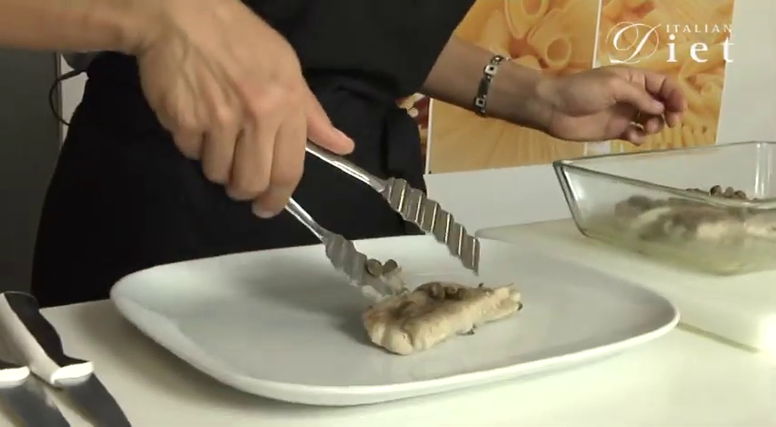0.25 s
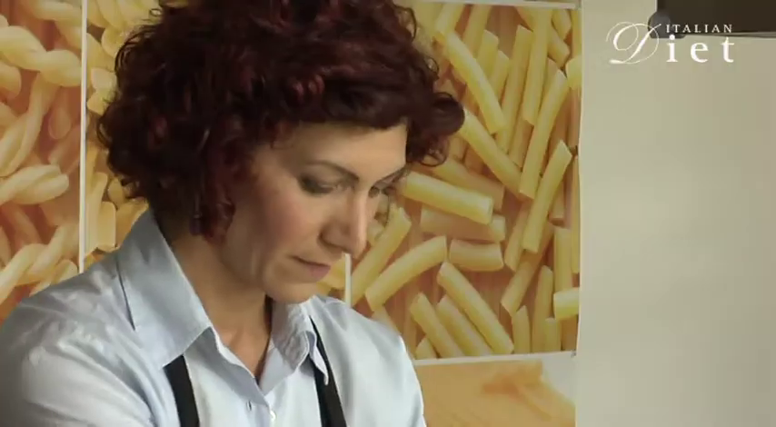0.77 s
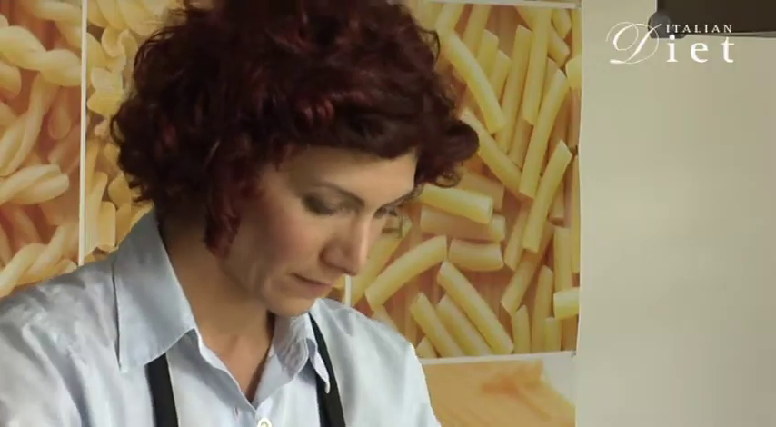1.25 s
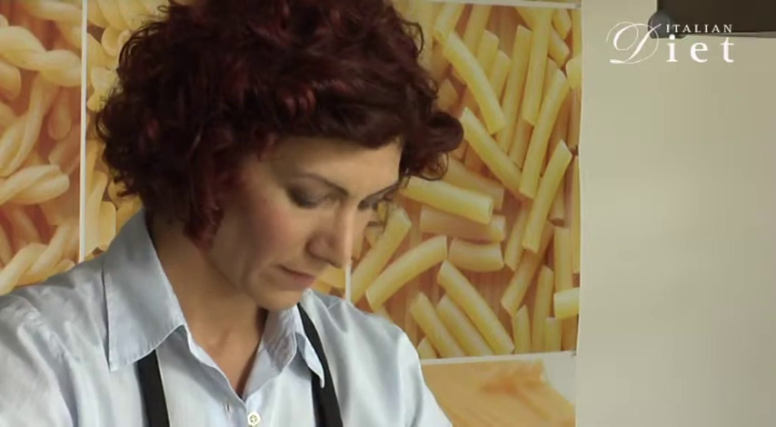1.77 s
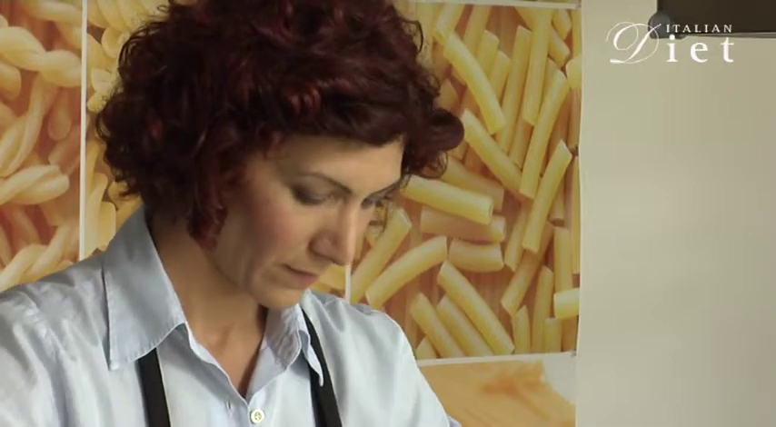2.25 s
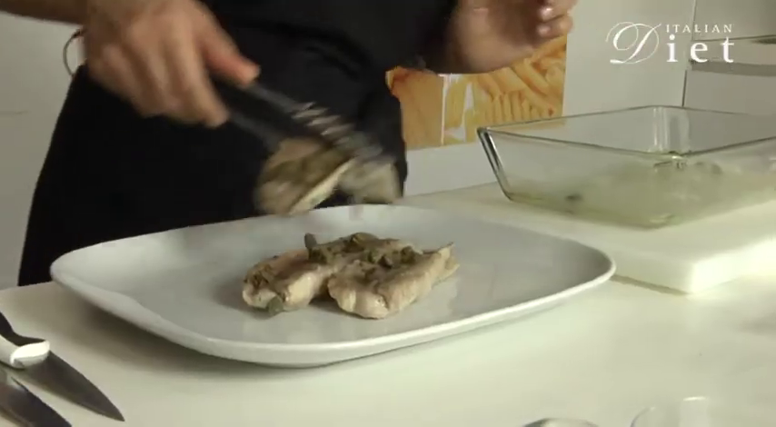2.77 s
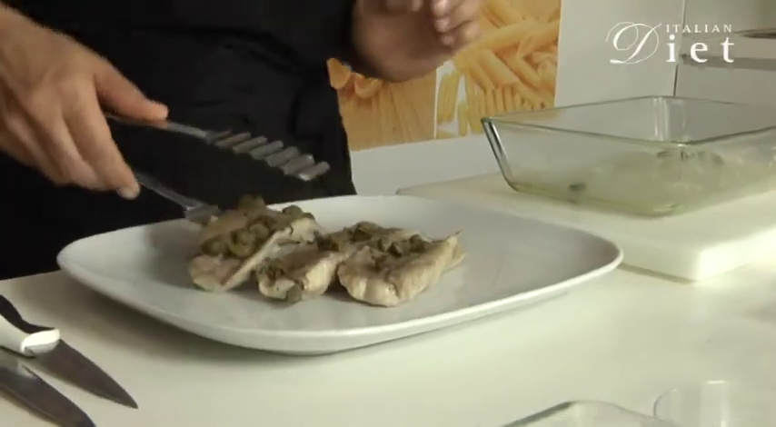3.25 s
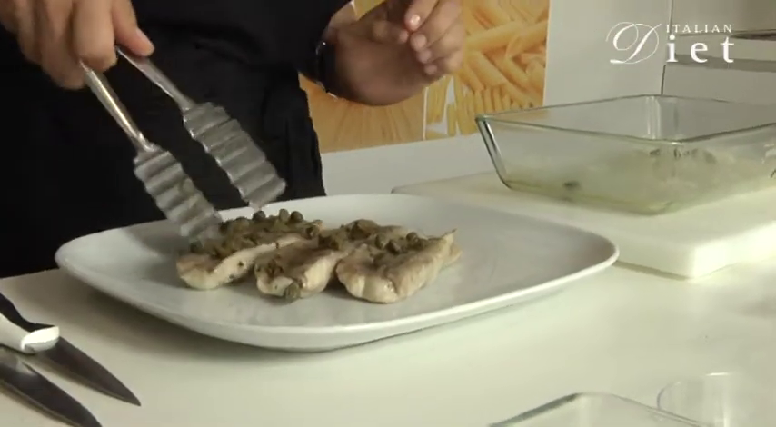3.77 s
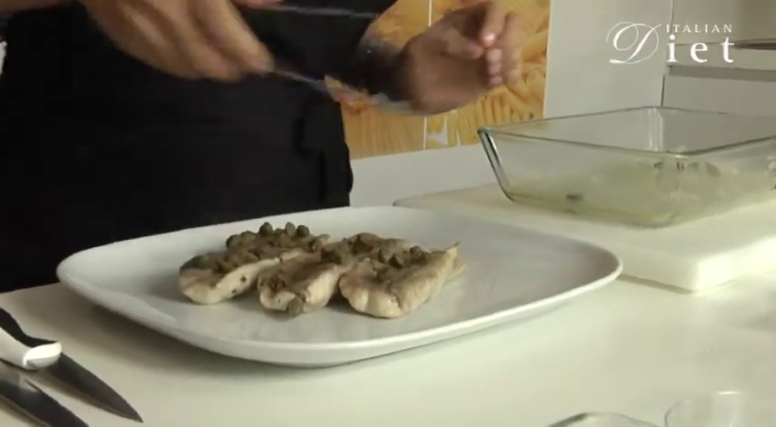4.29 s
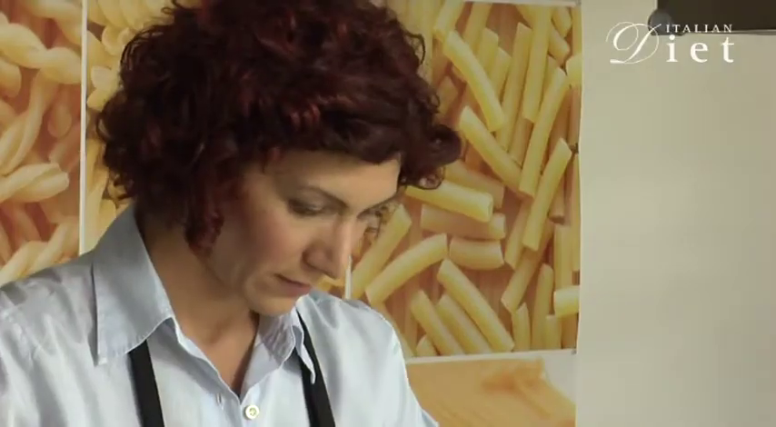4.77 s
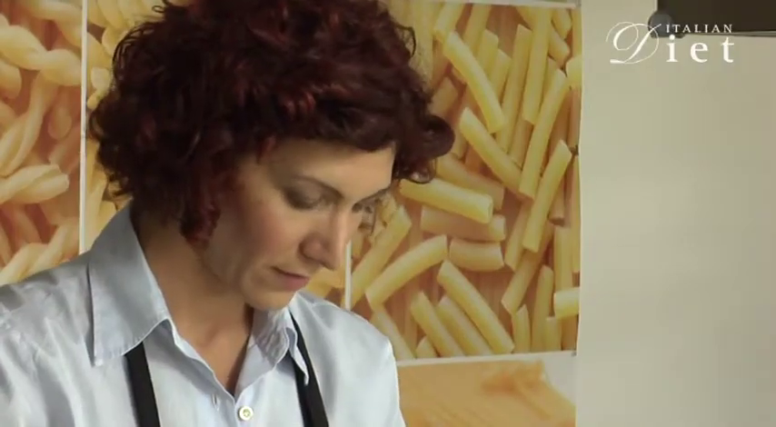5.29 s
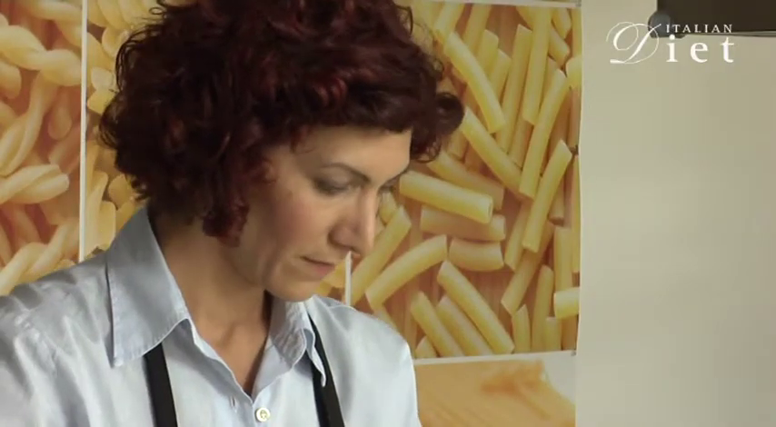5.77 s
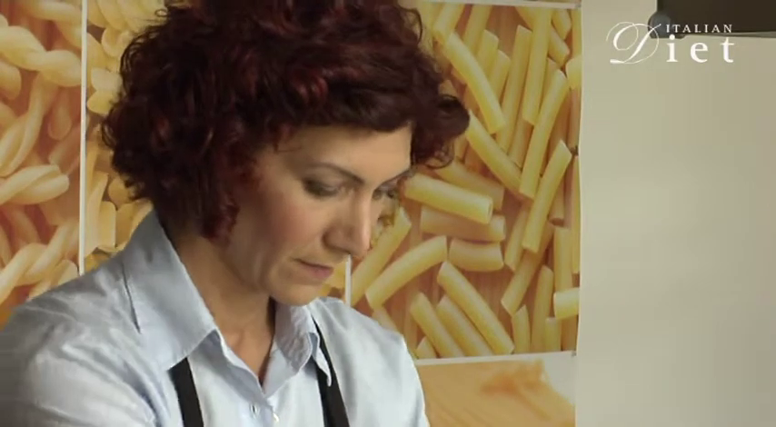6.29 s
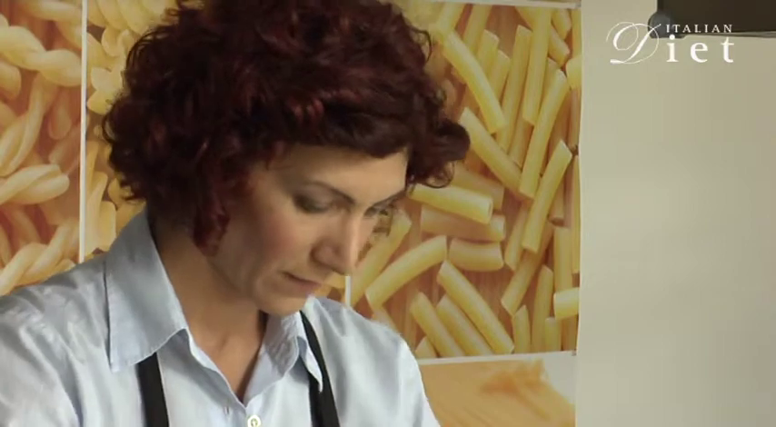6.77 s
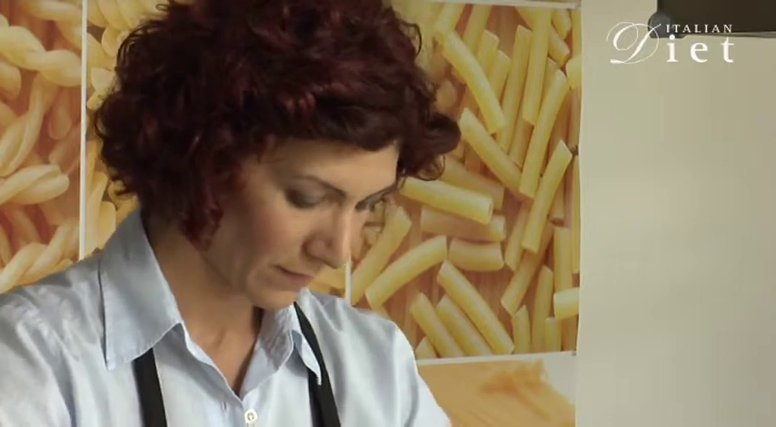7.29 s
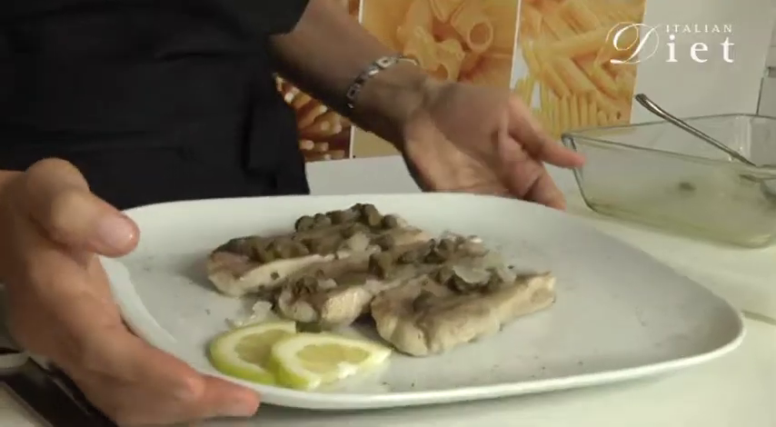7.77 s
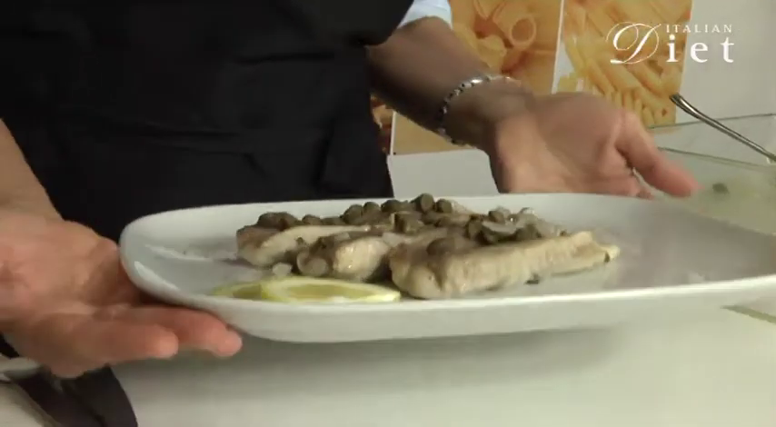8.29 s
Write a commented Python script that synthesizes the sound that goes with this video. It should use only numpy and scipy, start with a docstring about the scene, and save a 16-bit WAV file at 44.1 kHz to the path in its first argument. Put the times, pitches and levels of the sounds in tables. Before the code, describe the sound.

Close in a quiet, faintly humming kitchen, steel tongs scrape and tap a ceramic plate, then click twice on a glass dish. One sharp plate tap follows, then sleeve rustle and a tiny bracelet jingle. Suddenly the tongs drop on the worktop with a very loud crack, bouncing and ringing. A second smaller clatter follows, then dragging, a hard plate knock and a last ceramic clack.

```python
"""A low room tone with faint motor tones is heard first, in a quiet kitchen with the microphone close to the hands.
Near by, steel tongs tap a ceramic plate and a glass dish, a sleeve rustles and a bracelet jingles; then the tongs
drop on the worktop, where they knock, bounce and ring, and the plate is slid and lifted. Struck things are sums of
dying sines with a crack of noise, rubbing is trains of slips, cloth and room are shaped noise, and short echoes
follow. The sound is spliced twice, which cuts ringing and echoes short."""
import sys
import numpy as np
from scipy import signal
from scipy.io import wavfile
from scipy.ndimage import uniform_filter1d

SR = 44100
rng = np.random.default_rng(int(sys.argv[2]) if len(sys.argv) > 2 else 0)


def generate_wav(sig):
    """Save sig (samples, or channels by samples) to the path in sys.argv[1] as 16-bit PCM at SR."""
    pcm = np.round(np.clip(np.atleast_2d(sig).T, -1, 1) * 32767).astype(np.int16)
    wavfile.write(sys.argv[1], SR, pcm)


N = 376613  # length in samples

# Background spectrum of the room. Each row: frequency in Hz, relative density in dB.
ROOM_SPECTRUM = [(12, -52.5), (20, -31.5), (135, -4.5), (165, -5), (251, 0), (361, -8.5), (428, -8),
                 (566, -12.5), (670, -13), (1690, -28.5), (5210, -38.5), (6000, -35), (8410, -40.5),
                 (15800, -42), (16200, -61.5)]
# Swelling of the room hum. Each row: time in seconds, level in dB.
ROOM_LEVEL = [(0, -57), (1.3, -55.5), (1.7, -57), (2.8, -56), (4.2, -58), (5.2, -56), (6.2, -56),
              (7.4, -57), (8.54, -59)]
# A deep rumble from outside. Each row: time in seconds, level in dB rms.
RUMBLE_LEVEL = [(4.5, -85), (4.816, -70), (5.698, -66), (5.908, -74), (6.1, -64)]
# Faint tones of a motor. Each row: frequency in Hz, level in dB rms about which it wavers.
MOTOR_TONES = [(220.7, -69.5), (436.0, -72), (678.3, -80.5)]
# Dying of the echoes in the kitchen. Each row: frequency in Hz, t60 in seconds.
KITCHEN_T60 = [(250, 0.73), (1000, 0.38), (3000, 0.24), (7000, 0.15), (14000, 0.067)]
# Splices, with the start and a time past the end. Each entry: time in seconds.
SPLICE_TIMES = [0, 2.3205, 7.4408, 9]

# Strokes over the plate. Each row: start, strongest and end in seconds, strongest level in dB,
# blend of the two rubbing sounds from 0 to 1.
PLATE_SCRAPES = [(0.0, 0.055, 0.12, -72, 0.9), (0.128, 0.138, 0.155, -54, 0.16),
                 (0.15, 0.16, 0.2, -54, 0.1), (7.413, 7.523, 7.56, -60, 0.5),
                 (7.566, 7.568, 7.615, -50, 0.5), (7.96, 7.996, 8.05, -69, 0.45)]
# Sleeve rustles. Each row: start, strongest and end in seconds, strongest level in dB.
SLEEVE_RUBS = [(0.056, 0.146, .24, -66), (1.795, 1.88, 2.2, -72), (2.373, 2.558, 2.66, -66),
               (2.645, 2.757, 2.97, -71), (2.965, 3.116, 3.3, -69), (4.63, 4.78, 5.07, -59.5),
               (5.06, 5.105, 5.2, -62.5), (5.19, 5.24, 5.42, -61.5), (5.427, 5.484, 5.55, -69),
               (6.664, 6.777, 6.92, -57.5), (6.982, 7.083, 7.16, -58), (7.226, 7.414, 7.42, -57),
               (7.437, 7.498, 7.62, -60)]
# Spectrum of rubbed cloth. Each row: frequency in Hz, relative density in dB.
CLOTH_SPECTRUM = [(590, -34.5), (1000, 3.5), (1490, 0.5), (1680, 1), (2210, -3), (2470, -0.5), (6980, -6),
                  (14000, -31)]
# Small ticks and crinkles, and the sharp clicks at the onset of two worktop knocks (at 6.1602 and 6.2828).
# Each row: start in seconds, peak in dB, centre in Hz, decay time in ms.
TICKS_AND_CLICKS = [(.096, -60, 8500, 1.6), (.75, -58, 5500, 2.5), (1.8, -62, 4900, 2.5),
                    (1.036, -56.5, 3740, 3.2), (1.093, -56.5, 3000, 4.7), (1.336, -43, 4400, 1.06),
                    (3.191, -58, 5200, 1.5), (3.266, -55, 2400, 1.5), (3.347, -57, 5000, 1.5),
                    (3.370, -48.5, 3120, 1.2), (3.736, -59.5, 3230, 1.4), (4.972, -58, 10500, 28),
                    (5.04, -52, 2570, 1.3), (5.618, -57, 2780, 2.5), (5.988, -47, 840, 1.8),
                    (6.056, -52.5, 3240, 13.6), (6.056, -56.5, 8000, 3.5), (6.1602, -21, 7500, 1.2),
                    (6.2828, -36, 7000, 1.2), (7.016, -45, 4400, 3.3), (7.052, -45.5, 3470, 3.2),
                    (7.081, -46, 4800, 3.8), (7.283, -50, 3500, 3.3), (7.31, -51, 3470, 2.7),
                    (7.331, -52.5, 4530, 3.2), (7.348, -54, 6500, 2.6), (7.399, -41, 4500, 4)]
# Thin squeaks of rubbing. Each row: start, strongest and end in seconds, strongest level in dB,
# first and last pitch in Hz.
SQUEAK_GLIDES = [(.112, .16, .18, -55, 2910, 2720), (2.815, 2.9, 2.91, -68, 1537, 1537),
                 (7.172, 7.178, 7.23, -49.5, 1200, 1168), (7.365, 7.372, 7.418, -47.5, 1164, 1230)]
# Links at the wrist. Each row: start, strongest and end in seconds, strongest level in dB,
# blend of the two places on the links from 0 to 1.
JINGLES = [(4.84, 4.874, 4.95, -68, 0.1), (4.945, 4.985, 5.04, -62.5, .05), (5.036, 5.11, 5.19, -66, 0.95),
           (5.214, 5.235, 5.27, -62, .8)]
# Dragging on the worktop, and at 6.317 the chatter between knocks. Each row: start, strongest and end in seconds,
# strongest level in dB, dullness from 0 to 1.
WORKTOP_RUBS = [(6.317, 6.38, 6.43, -34, 0), (6.594, 6.65, 6.71, -39.5, 0.14),
                (7.035, 7.039, 7.07, -42, 0.93), (7.048, 7.076, 7.16, -44, 0.91),
                (7.142, 7.202, 7.23, -43.5, 0.38), (7.275, 7.287, 7.36, -43.5, .95),
                (7.376, 7.415, 7.42, -30, 0.48), (7.432, 7.447, 7.48, -43.5, .05),
                (7.46, 7.533, 7.56, -45, 0.23), (7.55, 7.583, 7.625, -41.5, 0.54)]

# Ringing modes of the ceramic plate. Each row: frequency in Hz, relative level in dB when struck at place 0
# and at place 1, undamped t60 in seconds.
PLATE_MODES = [(969, -24, -37, .1), (1292, -26, -24, .08), (1776, -28, -15, .08), (2702, -8, -20, .06),
               (2907, -28, -3, .05), (3128, -18, -25, .06), (3450, -36, -13, .05), (3806, -33, -14, .06),
               (4267, -1, -14, .045), (4650, -10, -3, .06), (4791, -17, -19, .24), (5675, -24, -11, .09),
               (5903, -11, -1, .085), (7569, -16, -34, .09), (7892, -40, -16, .06), (8800, -25, -36, .09),
               (10630, -31, -31, .08), (11140, -30, -24, .07), (12950, -35, -17, .06),
               (13680, -30, -23, .06), (14500, -34, -15, .025), (15300, -44, -20, .025)]
# Modes of the glass dish. Each row: frequency in Hz, dB at places 0 and 1, undamped t60 in seconds.
DISH_MODES = [(713, -10.5, -11, 0.061), (1475, -19, -16, 0.14), (2680, -15, -9, 0.13),
              (2755, -22, 5.5, 0.066), (3110, -1, 6, 0.03), (3700, -22, -4, 0.09), (4220, 5, -13, 0.042),
              (4610, 0, 2, 0.041), (5670, -3, 2, 0.03), (6360, -1, -10, 0.048), (7540, 2.5, -21, 0.038),
              (8750, -4, -12, 0.044), (8970, -1, -18, 0.052), (10500, -4, 0, 0.034), (11600, -2, -13, .025),
              (12700, -3, 1, 0.022), (14620, -5, -3, 0.018)]
# Modes of the metal links. Each row: frequency in Hz, dB at places 0 and 1, undamped t60 in seconds.
LINK_MODES = [(5960, 0, -9, .06), (6870, -8, 0, .06), (7680, -14, -1, .06), (8890, -6, -20, .05),
              (9720, -20, -11, .05), (12200, -18, -15, .04)]
# Modes of the worktop. Each row: frequency in Hz, dB at places 0, 1 and 2, undamped t60 in seconds.
WORKTOP_MODES = [(251.2, -31, -40.5, -39, 0.017), (535, -7.5, -10, -7, 0.029), (840, -21, -30.5, -27, .03),
                 (1217, 3, -28, -21, 0.04), (1334, -0.5, -10.5, -4.5, 0.045), (1487, 0.5, 0, -18, 0.038),
                 (1590, -11.5, -9, -9, 0.05), (1788, -6, -20.5, -7, .035), (2140, -6.5, -9.5, -12, 0.063),
                 (2213, -0.5, -4, -3.5, 0.03686), (2350, -17, -15, 0.5, 0.058),
                 (2541, -10.5, -0.5, -2, 0.043), (2760, -13.5, -3.5, -4, 0.0089),
                 (3098, -13.5, -10.5, -12.5, 0.035), (3623, -14, -16.5, -24, 0.057),
                 (3913, -18, -18.5, -9.5, 0.057), (4380, -21.5, -12.5, -14, 0.025)]
# Modes of the steel tongs. Each row: frequency in Hz, dB at places 0 to 3, undamped t60 in seconds.
TONG_MODES = [(2810, -11, -14, -20, -16, .11), (3074, -25, -22, -6, -7, .09), (3240, -18, -9, -16, -20, .3),
              (3500, -30, -30, -30, -8, .15), (3768, -21, -12, -13, -18, .2), (4240, -5, 0, -6, -11, .08),
              (4608, -14, -14, -12, -2, .15), (4855, -13, -8, -20, -21, .19),
              (5486, -13, -14, -21, -20, .09), (5771, -17, -8, -20, -4, .15),
              (5916, -18, -11, -2, -21, .09), (6175, -12, -11, -1, -10, .11), (6300, 0, -9, -2, -18, .1),
              (6874, -19, -2, -11, -10, .07), (7117, -8, -10, -9, -18, .13), (7316, -21, -18, -7, -13, .2),
              (7833, -27, -27, -10, -17, .15), (8489, -27, -20, -3, -23, .12),
              (8845, -25, -16, -15, -15, .15), (9205, -22, -2, -2, -28, .13), (9790, -21, -14, -6, -20, .1),
              (10500, -40, -25, -12, -17, .14), (10740, -16, -20, -20, -19, .12),
              (11300, -29, -14, -13, -22, .08), (12450, -30, -14, -17, -28, .11),
              (13190, -24, -36, -21, -27, .07), (13830, -32, -19, -25, -28, .08),
              (14680, -18, -16, -28, -36, .09), (15400, -22, -18, -27, -33, .07)]
# Modes of the plate as it meets the worktop. Each row: frequency in Hz, dB, undamped t60 in seconds.
LADEN_PLATE_MODES = [(530, -26, 0.02), (1415, -3, 0.031), (2160, -5, 0.012), (2580, -9, 0.018),
                     (3250, -3.5, 0.015), (4250, -17.5, 0.02), (4610, -6, 0.0052), (5600, -19.5, .015),
                     (6810, -32, 0.055), (7640, -33, 0.039), (9600, -39, 0.017)]
# Modes of the plate's foot. Each row: frequency in Hz, dB, undamped t60 in seconds.
PLATE_FOOT_MODES = [(790, -20, 0.08), (1271, -12.5, 0.063), (1660, -16, 0.077), (2274, -17, 0.096),
                    (2655, -12.5, 0.088), (3054, -1.5, 0.053), (4086, -1.5, 0.049), (4767, -0.5, 0.043),
                    (5650, -3.5, 0.053), (6400, 5.5, 0.0098), (7900, -18, 0.035), (9390, -12.5, 0.06),
                    (10200, -12, 0.031), (11250, -4.5, 0.025), (11600, -21, 0.05), (12840, -3, 0.02),
                    (13200, -19, 0.07), (14370, -13, 0.035), (15700, -4, 0.016)]

# Blows on the plate. Each row: start in seconds, peak of the ring in dB, place,
# softness in dB an octave, damping factor that divides t60.
PLATE_BLOWS = [(0.259, -21.5, 0.065, -1, 0.94), (3.406, -16, 1, 1, 1.3), (3.457, -42.5, 1, 9, 1.9)]
# Blows on the dish. Each row: start in seconds, ring peak in dB, place, softness in dB an octave, damping factor.
DISH_BLOWS = [(2.248, -22, .1, .6, 1.2), (2.293, -26, 0.97, .49, 1.25)]
# Knocks on the worktop. Each row: start in seconds, ring peak in dB, place, softness in dB an octave,
# damping factor, change in dB at each bounce.
WORKTOP_KNOCKS = [(6.132, -47, 0.73, 2, 2.6, -20.5), (6.1604, 0.64, 0.12, 1, 1.8, -22),
                  (6.283, -11.5, 0.033, 4.5, 1.17, -11.5), (6.331, -22, 0.54, 2, 0.62, -10),
                  (6.389, -21, 0.11, 4, 0.74, -5), (6.4306, -7.5, 0.98, -0.5, 1.36, -24),
                  (6.447, -16, 0.56, 4, 1.15, -5), (6.9066, -10.5, 2.2, -0.4, 2.5, -26),
                  (6.9115, -17.5, 1.8, 0.1, 1.8, -22.5), (6.917, -19, 1.2, 3.5, 1.5, -26.5),
                  (6.923, -20.5, 2, 3.5, 2.2, -23), (6.935, -17, 1.6, 2, 1.6, -10.5),
                  (7.040, -44, .5, 19.5, 1.5, -12.5)]
# Blows on the tongs. Each row: start in seconds, ring peak in dB, place, softness in dB an octave, damping factor.
TONG_BLOWS = [(6.16, -33, 2.4, 1, 1.1), (6.33, -15, 0.02, -0.1, 1.34), (6.3444, -9, 0.77, -0.3, 2.2),
              (6.36, -15.5, 1.2, 0, 1.15), (6.4313, -13.5, 1.45, -2, 1.2), (6.443, -11.5, 1.65, -1.5, 2.4),
              (6.446, -10.5, 2.3, -0.9, 0.9), (6.63, -44, 0.2, 11, 1.3), (6.906, -36, 2.2, -1, 0.56),
              (6.9431, -25.5, 2.95, 1.5, 1.18)]
# Plate meets worktop. Each row: start in seconds, ring peak in dB, a fixed 0.5 that has no effect,
# softness in dB an octave, damping factor.
LADEN_PLATE_BLOWS = [(7.4202, 0, .5, 3.2, 1.06), (7.4226, -2, .5, 0.1, 1.89)]
# Blows on the foot. Each row: start in seconds, ring peak in dB, a fixed 0.5 that has no effect,
# softness in dB an octave, damping factor.
FOOT_BLOWS = [(8.098, -10.5, .5, 3.1, 1.25), (8.103, -11.5, .5, 2, 0.85), (8.107, -15.5, .5, 7.1, 0.92),
              (8.46, -37.5, .5, 8.7, 0.91)]

# Loose contact makes each mode waver: seconds between random levels, their spread in dB.
WAVER_S, WAVER_DB = 0.009, 3.5


def amp(db):
    """Turn decibels into an amplitude ratio."""
    return 10 ** (np.asarray(db) / 20)


def evened(x):
    """Scale a sound to an rms of one."""
    return x / np.sqrt(np.mean(x ** 2) + 1e-20)


def read(points, hz):
    """Read a curve between its points along a logarithmic frequency axis."""
    point_hz, value = np.transpose(points)
    return np.interp(np.log(hz + 1), np.log(point_hz + 1), value)


def band(x, low_hz, high_hz, order=2):
    """Keep only the band between two frequencies."""
    sos = signal.butter(order, (low_hz, high_hz), "bandpass", fs=SR, output="sos")
    return signal.sosfilt(sos, x)


def add(mix, s, sound):
    """Lay a sound into the mix at s seconds, cut at the end of the mix."""
    part = mix[round(s * SR):][:len(sound)]
    part += sound[:len(part)]


def hiss(spectrum, size, patchy_db):
    """Noise of a given spectrum, with patches of level that drift in time and frequency."""
    hz = np.fft.rfftfreq(2048, 1 / SR)
    real, imaginary, patches = rng.standard_normal((size // 512 + 5, 1025, 3)).T
    patches = uniform_filter1d(patches, size=12, axis=0)
    patches = evened(uniform_filter1d(patches, size=12, axis=1))
    level_db = read(spectrum, hz)[:, None] + patchy_db * patches
    z = (real + 1j * imaginary) * amp(level_db)
    return evened(signal.istft(z, nperseg=2048, noverlap=1536)[1][:size])


def pressure(start, strongest, end, db, ends_db):
    """A stroke swells to its strongest and dies away, ends_db at both ends, with tapered edges."""
    t = np.arange(max(start, 0), end, 1 / SR)
    first = round(t[0] * SR)
    swell_db = np.interp(t, [start, strongest, end], [ends_db, 0, ends_db])
    return slice(first, first + len(t)), amp(db + swell_db) * signal.windows.tukey(len(t), 0.1)


def ring(modes, place, soft_db=0, damping=1, contact_db=0, together=False):
    """Dying, wavering sines: place blends the mode levels if there are several, contact drains dB a second."""
    hz, *levels, t60 = np.transpose(modes)[:, :, None]
    t = np.arange(min(SR // 4, int(SR * t60.max() / damping))) / SR
    place = np.clip(place, 0, len(levels) - 1)
    share = np.maximum(1 - abs(place - np.arange(len(levels))), 0)
    db = np.tensordot(share, levels, 1) - soft_db * np.log2(hz / 3000)
    # neighbouring modes start together or in opposite directions
    side = (1 if together else -1) ** np.arange(len(hz))[:, None]
    step, part = np.divmod(t / WAVER_S, 1)
    step = step.astype(int)
    knots = WAVER_DB * rng.standard_normal((len(hz), step[-1] + 2))
    knots[:, 0] = 0  # the onset keeps its level
    waver_db = knots[:, step] * (1 - part) + knots[:, step + 1] * part
    decay_db = 60 * t * damping / t60 + contact_db * t
    return (side * amp(db + waver_db - decay_db) * np.sin(2 * np.pi * hz * t)).sum(0)


def strike(modes, blows, rise_ms, crack_db, crack_hz, crack_s, rattle_db, contact_db, together=False):
    """Each blow quickly swells the modes and adds a crack of noise with a rattling tail, duller if soft."""
    out = np.zeros(N)
    lowest_hz, reach_hz = crack_hz  # the reach is divided by 2.5 or more below
    for s, db, place, soft_db, damping in blows:
        body = ring(modes, place, soft_db, damping, contact_db, together)
        body = np.pad(body, (0, max(SR // 8 - len(body), 0)))  # the rattle outlasts a damped ring
        t = np.arange(len(body)) / SR
        swell = 1 - np.exp(-1000 * t / rise_ms)
        body = swell * body
        top_hz = np.clip(reach_hz / (2.5 + 0.16 * abs(soft_db)), 1.5 * lowest_hz, SR / 2 - 1000)
        noise = rng.standard_normal(len(t))
        crack = evened(band(noise, lowest_hz, top_hz, order=3)) / 2
        fade = np.exp(-t / crack_s) + amp(rattle_db) * np.exp(-t / 0.029)
        sound = body / abs(body).max() + amp(crack_db) * crack * swell * fade
        until = min(cut for cut in SPLICE_TIMES if cut > s)
        add(out, s, amp(db) * sound * (s + t < until))
    return out


def stroke(rings, strokes, slips_per_s, ends_db):
    """Rubbing is a train of uneven slips that drives a blend of two rings of the object."""
    out = np.zeros(N)
    happens = rng.random(N) < slips_per_s / SR
    slips = rng.standard_normal(N) * amp(1.4 * rng.exponential(1, N)) * happens
    first, second = (evened(signal.oaconvolve(slips, r)[:N]) for r in rings)
    for *shape, blend in strokes:
        span, level = pressure(*shape, ends_db)
        share = np.clip(blend, 0, 1)
        out[span] += level * ((1 - share) * first[span] + share * second[span])
    return out


def room_tone():
    """Distant low hum, a passing rumble and the faint hiss of the microphone."""
    t = np.arange(N) / SR
    background = hiss(ROOM_SPECTRUM, N, patchy_db=2.0)
    low = signal.sosfilt(signal.butter(1, 1500, fs=SR, output="sos"), background)
    level = amp(np.interp(t, *np.transpose(ROOM_LEVEL)))
    rumble_level = amp(np.interp(t, *np.transpose(RUMBLE_LEVEL), -99, -99))
    rumble = rumble_level * evened(band(rng.standard_normal(N), 75, 84))
    # only the hum swells, the hiss is steady
    return level * low + level.mean() * (background - low) + rumble


def motor():
    """Faint tones of a motor that waver slowly in level."""
    out, t = np.zeros(N), np.arange(N) / SR
    knots = np.arange(0, N / SR + 1, 0.15)
    for hz, db in MOTOR_TONES:
        waver_db = np.interp(t, knots, 0.98 * rng.standard_normal(len(knots)))
        tone = np.sqrt(2) * np.sin(2 * np.pi * (hz * t + rng.random()))
        out += amp(db + waver_db) * tone
    return out


def plate_scrapes():
    """Slips over the plate drive a broad ring and a narrower, more damped one."""
    broad = band(ring(PLATE_MODES, 0.3, 3.5, 1.1), 2400, 12000, order=3)
    narrow = band(ring(PLATE_MODES, 0.93, damping=2.2), 5100, 8200, order=3)
    return stroke([broad, narrow], PLATE_SCRAPES, slips_per_s=1100, ends_db=-8.5)


def sleeve():
    """Cloth rubs on cloth: a soft hiss with fine grain."""
    out = np.zeros(N)
    grain = amp(0.98 * evened(uniform_filter1d(rng.standard_normal(N), size=500)))
    rub = evened(grain * hiss(CLOTH_SPECTRUM, N, patchy_db=-1.0))
    for row in SLEEVE_RUBS:
        span, level = pressure(*row, ends_db=-14)
        out[span] += level * rub[span]
    return out


def ticks_and_clicks():
    """Each tick, crinkle or knock's click is a brief burst of noise around its own pitch, with a quick rise."""
    out, t = np.zeros(N), np.arange(SR // 10) / SR
    for s, db, hz, ms in TICKS_AND_CLICKS:
        u = 1000 * t / ms
        noise = rng.standard_normal(len(t)) * (1 - np.exp(-4 * u)) * np.exp(-u)
        burst = band(noise, hz / 1.4, hz * 1.4, order=3)
        add(out, s, amp(db) * burst / abs(burst).max())
    return out


def squeak():
    """Short thin rubbing tones that glide or hold, unsteady in level and phase."""
    out = np.zeros(N)
    width_hz = 93
    lowpass = signal.butter(2, width_hz / 2, fs=SR)
    for *shape, start_hz, end_hz in SQUEAK_GLIDES:
        span, level = pressure(*shape, ends_db=-6)
        slow = signal.lfilter(*lowpass, rng.standard_normal((2, SR // 4)))[:, -len(level):]
        turns = np.cumsum(np.linspace(start_hz, end_hz, len(level))) / SR
        tone = np.sin(2 * np.pi * turns + evened(slow[1]))
        out[span] += level * evened((0.4 + evened(slow[0])) * tone)
    return out


def plate_taps():
    """Tongs tap the ceramic plate: short bright modes and a sharp crack."""
    return strike(PLATE_MODES, PLATE_BLOWS, rise_ms=1.0, crack_db=-1.5, crack_hz=(2300, 30000),
                  crack_s=0.0023, rattle_db=-27, contact_db=62)


def dish_taps():
    """Tongs tap the glass dish: its modes ring beneath a lighter crack."""
    return strike(DISH_MODES, DISH_BLOWS, rise_ms=0.75, crack_db=-7.5, crack_hz=(1500, 24000),
                  crack_s=0.0046, rattle_db=-22, contact_db=30)


def bracelet():
    """Small links at the wrist jingle as uneven slips drive their modes at two places."""
    rings = [ring(LINK_MODES, place, damping=1.7) for place in (0, 1)]
    return stroke(rings, JINGLES, slips_per_s=810, ends_db=-10)


def bounced(knocks):
    """Every knock is followed by two weaker bounces at one fixed place."""
    blows = [row[:5] for row in knocks]
    for count, delay_s in enumerate((0.0097, 0.021), start=1):  # both counted from the knock
        for s, db, _, soft_db, damping, loss_db in knocks:
            blows.append((s + delay_s, db + count * loss_db, 0.35, soft_db, damping))
    return blows


def worktop_knocks():
    """Knocks and bounces on the worktop: low modes that all start in the same direction."""
    return strike(WORKTOP_MODES, bounced(WORKTOP_KNOCKS), rise_ms=0.95, crack_db=-6.5, crack_hz=(600, 6500),
                  crack_s=0.0034, rattle_db=-11.5, contact_db=30.0, together=True)


def tongs():
    """The dropped steel tongs ring in many high modes, with a strong rattle."""
    return strike(TONG_MODES, TONG_BLOWS, rise_ms=1.1, crack_db=-9.5, crack_hz=(2500, 24000),
                  crack_s=0.0064, rattle_db=-5.5, contact_db=92.0)


def worktop_rubs():
    """Chatter between knocks, then dragging: slips drive a brighter and a duller ring of the worktop."""
    bright = band(ring(WORKTOP_MODES, 0, 6.5, 2.7), 370, 6000)
    dull = band(ring(WORKTOP_MODES, 0, 22, 7.7), 160, 1100)
    return stroke([bright, dull], WORKTOP_RUBS, slips_per_s=1800, ends_db=-14.5)


def laden_plate():
    """The plate meets the worktop: short modes with a faint crack."""
    return strike(LADEN_PLATE_MODES, LADEN_PLATE_BLOWS, rise_ms=0.69, crack_db=-18, crack_hz=(900, 11000),
                  crack_s=0.0019, rattle_db=-8.5, contact_db=57.5)


def plate_foot():
    """Blows on the plate's foot: a fast rise, and contact that drains the ring quickly."""
    return strike(PLATE_FOOT_MODES, FOOT_BLOWS, rise_ms=0.36, crack_db=-1.5, crack_hz=(600, 19000),
                  crack_s=0.0024, rattle_db=-26.5, contact_db=191)


def kitchen():
    """Sparse echoes of random sign, each band dying at its own speed."""
    taps = np.zeros(SR // 2)
    at = np.arange(200, len(taps) - 20, 20)  # one echo in every 20 samples
    taps[at + rng.integers(0, 20, len(at))] = rng.choice([-1., 1.], len(at))
    hz, t, z = signal.stft(taps, SR, nperseg=256)
    decay = amp(-60 * t / read(KITCHEN_T60, hz)[:, None])
    tail = signal.istft(z * decay, SR, nperseg=256)[1]
    return tail / np.linalg.norm(tail)


def scene():
    """Sum the near sounds, give them echoes between the splices and lay them over the unbroken background."""
    out = room_tone() + motor()
    near = plate_scrapes() + sleeve() + ticks_and_clicks() + squeak()
    near += plate_taps() + dish_taps() + bracelet()
    near += worktop_knocks() + tongs() + worktop_rubs()
    near += laden_plate() + plate_foot()
    # small things radiate no bass
    near = signal.sosfilt(signal.butter(2, 190, "highpass", fs=SR, output="sos"), near)
    echoes = kitchen()
    for start, end in zip(SPLICE_TIMES, SPLICE_TIMES[1:]):  # no echo crosses a splice
        part = near[round(start * SR):round(end * SR)]
        add(out, start, part + amp(-18.0) * signal.oaconvolve(part, echoes)[:len(part)])
    return out[None]


def record(dry):
    """Peaks clip just below full scale; then a steep filter limits the band."""
    clipped = np.clip(dry, -0.98, 0.98)
    lowpass = signal.firwin(255, 16700, window=("kaiser", 9), fs=SR)  # cutoff in Hz
    return signal.oaconvolve(clipped, lowpass[None], "same")


dry = scene()
out = record(dry)
generate_wav(out)
```